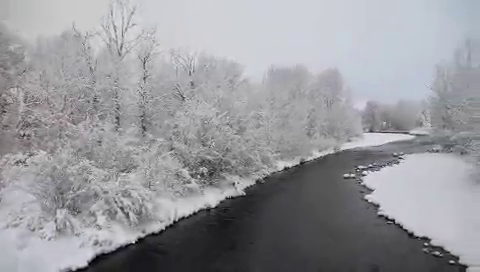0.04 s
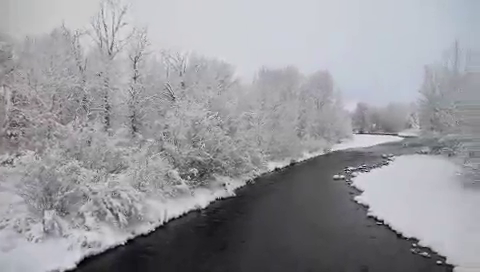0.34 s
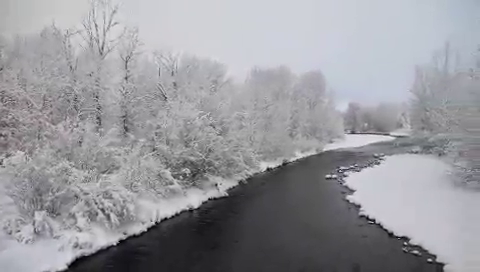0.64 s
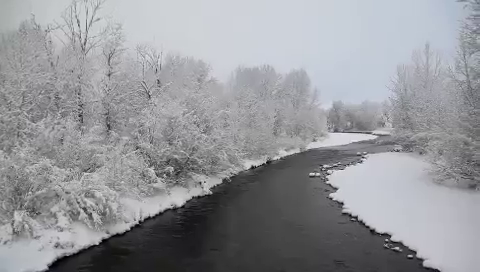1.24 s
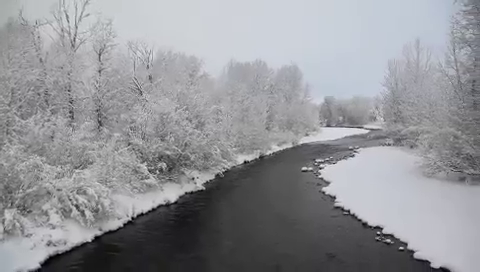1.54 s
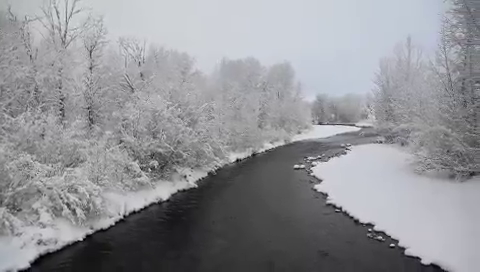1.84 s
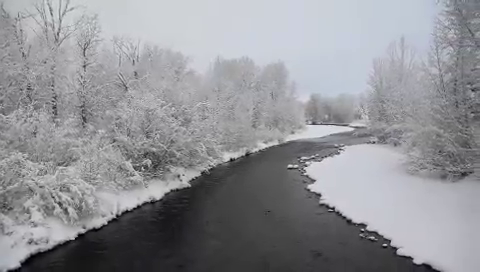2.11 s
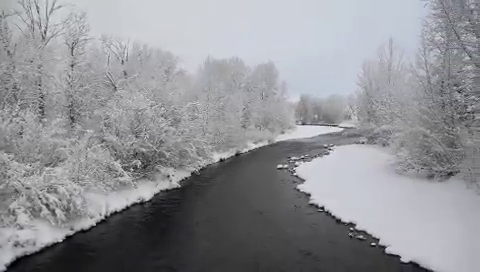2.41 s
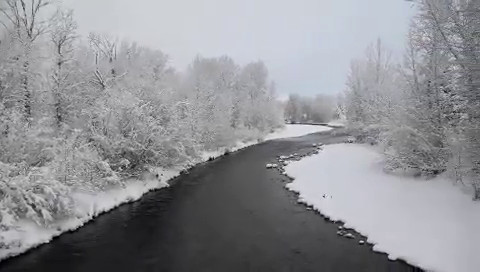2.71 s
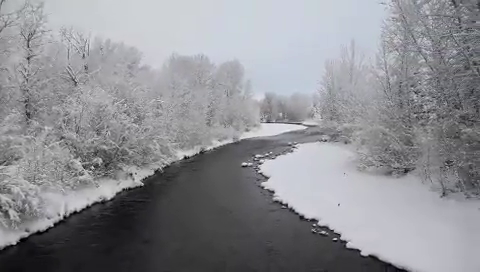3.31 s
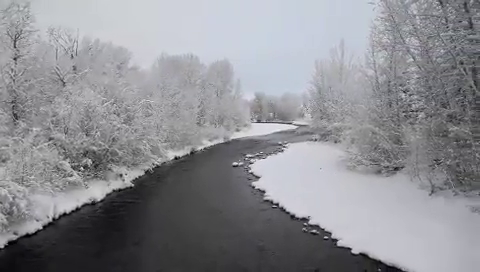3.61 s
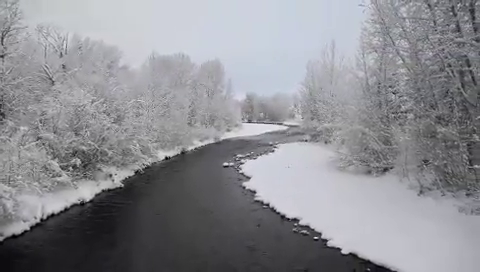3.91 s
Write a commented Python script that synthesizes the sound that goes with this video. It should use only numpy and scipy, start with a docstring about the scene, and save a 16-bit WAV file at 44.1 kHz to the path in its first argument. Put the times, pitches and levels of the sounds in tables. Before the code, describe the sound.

A small bird's high, buzzy trill starts loud just after the opening, then weakens and drops slightly in pitch. Beneath it runs the even rush of a woodland river, with occasional light ticks nearby.

```python
"""A snowy river rushes steadily from the start, a faint hum and a thin whine beneath it, and the first of
a few sharp ticks falls close by. A small bird then opens a long dry rattle, some ten buzzy notes a second:
one side of its syrinx holds a tone while the other sweeps up and down above it over 200 times a second.
The rattle slows and fades, and near the end a few shorter notes cross it. The scene is mono."""
import sys
import numpy as np
from scipy import signal
from scipy.fft import rfft, irfft, next_fast_len
from scipy.io import wavfile
from scipy.ndimage import uniform_filter1d, minimum_filter1d, map_coordinates

SR = 44100
rng = np.random.default_rng(int(sys.argv[2]) if len(sys.argv) > 2 else 0)


def file_out(sig):
    """Save sig as 16-bit WAV at sys.argv[1]."""
    # one column per channel
    cols = np.atleast_2d(sig).T
    # limit, then scale
    lim = np.clip(cols, -1, 1)
    pcm = np.round(lim * 32767).astype(np.int16)
    wavfile.write(sys.argv[1], SR, pcm)


N = 174195

BUZZ_HZ = 224.15  # pitch sweeps a second at the middle of a note


def bird():
    """The rattle: syrinx notes gain overtones and a breathy rasp, and the beak colours the tone."""
    # Each row: start in seconds, length in seconds, level in dB; the low tone's pitch, glide and arch
    # in Hz; the gap to the upper tone, its glide and the sweep depth in Hz; the low tone's balance in
    # dB, where the swell peaks (0-1), how hard the attack is chopped.
    notes = [(0.369, 0.04, -15, 4790, -450.0, -140.0, 1023, -360.0, 1250.0, -3.5, 0.5, 3),
             (0.4497, 0.039, -13.5, 4750, 644, 503, 996, -460.0, 1360, -1.5, 0.53, 4),
             (0.538, 0.039, -10.5, 4690, 106, 18, 468, 335, 1260, -9, 0.48, 0.7),
             (0.619, 0.042, -12, 4700, 282, 102, 464, 574, 1260, -6, 0.65, 3.5),
             (0.711, 0.045, -11.8, 4980, 114, 432, 328, 580.0, 1710, 0, 0.51, 3),
             (0.8011, 0.045, -13, 4810, -580.0, -89, 832, -310.0, 1140, 2, 0.41, 9),
             (0.89, 0.042, -13, 4610, 334, 2, 334, 454, 810.0, -4.5, 0.59, 9),
             (0.9887, 0.052, -12.5, 4710, -230.0, 372, 470, 184, 890, -1, 0.38, 3),
             (1.0813, 0.048, -14.5, 4670, 107, 350.0, 470.0, -180.0, 640, -5, 0.46, 9),
             (1.1658, 0.068, -14.5, 4590, -970.0, 52, 573, -570.0, 1420.0, -3, 0.52, 1),
             (1.267, 0.057, -12.5, 4790, -410.0, -200.0, 598, -570.0, 1130.0, 1, 0.52, 1.5),
             (1.361, 0.059, -15, 4756, -130.0, 222, 608, -310.0, 520.0, 3.5, 0.46, 2.5),
             (1.461, 0.048, -13, 4840, 16, 330.0, 910, 120.0, 1130.0, 4, 0.42, 0.5),
             (1.5536, 0.055, -14.5, 4765, -57, 305, 844, 340.0, 1180.0, 1, 0.49, 2.3),
             (1.6544, 0.06, -18.5, 4690, -320.0, 488, 674, 560.0, 1220, -3.5, 0.42, 1),
             (1.7567, 0.049, -16, 4630, 292, 190.0, 665, 596, 520.0, 2, 0.6, 2),
             (1.8524, 0.061, -16.6, 4590, 403, 37, 734, 590.0, 610.0, 4.5, 0.58, 1),
             (1.962, 0.057, -18, 4670, -30.0, 358, 456, 564, 500.0, -3.5, 0.5, 1.1),
             (2.0632, 0.056, -20.5, 4750.0, 338, 627, 495, 560.0, 507, -4, 0.33, 4),
             (2.171, 0.053, -19.5, 4580, 110.0, 620.0, 697, 480.0, 670.0, -8, 0.3, 3),
             (2.2784, 0.053, -16, 4465, -88, 356, 600.0, 293, 614, 0.5, 0.43, 1.2),
             (2.3725, 0.059, -18.3, 4570, -28, 203, 700, -490.0, 503, -5, 0.49, 2),
             (2.4745, 0.053, -14.9, 4550.0, 140.0, 462, 652, -130.0, 550.0, 0.5, 0.49, 1.5),
             (2.5776, 0.054, -16, 4640, -73, 400.0, 680, -120.0, 513, -1.5, 0.61, 1.5),
             (2.6833, 0.058, -21, 4490, -840.0, -130.0, 963, -440.0, 1370, 3, 0.52, 1),
             (2.793, 0.057, -20.5, 4590, -190.0, 334, 784, 318, 680.0, 2.5, 0.34, 0.5),
             (2.9, 0.058, -22, 4560, -350.0, 130.0, 777, -230.0, 457, -0.5, 0.42, 0),
             (2.9982, 0.06, -22, 4530, -230.0, 170.0, 725, -440.0, 400.0, 1, 0.6, 0.5),
             (3.0894, 0.038, -23.5, 4210, 990.0, 197, 555, -24, 1400, -26, 0.67, 0.5),
             (3.107, 0.059, -22, 4450.0, -230.0, 243, 653, 8, 422, 1, 0.5, 0.4),
             (3.1593, 0.041, -27, 4420, 920.0, 410.0, 577, 400.0, 540.0, -11, 0.6, 4),
             (3.2158, 0.053, -22, 4460, -30.0, 96, 870, -420.0, 1290.0, 3, 0.43, 2),
             (3.241, 0.032, -24.5, 4500.0, 230.0, -150.0, 487, 130.0, 500.0, -19, 0.57, 6),
             (3.315, 0.041, -24.5, 4380, 640.0, 117, 303, 50.0, 1190, -21, 0.57, 6),
             (3.3245, 0.056, -22.5, 4416, 0.0, 250.0, 845, -64, 540.0, 3, 0.2, 2),
             (3.3985, 0.032, -22.0, 4670, 953, 97, 294, -230.0, 860.0, -18, 0.64, 3),
             (3.4346, 0.054, -25.1, 4430, -130.0, 368, 690.0, -200.0, 360.0, 3, 0.17, 1.7),
             (3.495, 0.033, -24.9, 4730, 267, 650.0, 473, 310.0, 460.0, -4, 0.51, 2.5),
             (3.5417, 0.053, -24.5, 4360, -63, -120.0, 1130, -530.0, 640.0, 6, 0.65, 0.0),
             (3.659, 0.056, -26.5, 4460, -250, 107, 760, -250, 695, -0.5, 0.52, 1.8),
             (3.7697, 0.051, -25.2, 4360, 283, 546, 680.0, -120.0, 465, 1, 0.43, 2.6)]
    # One soft lead-in note, laid out the same way.
    lead_in = (.29, .019, -28, 4850, -200, 100, 300, 0, 1200, -3, .5, 2)
    # Each row: harmonic number, level in dB against the voice.
    harmonics = [(2, -17), (3, -45)]
    # The colour of the breath. Each row: frequency in Hz, relative level in dB.
    rasp_eq = [(3000, -37), (4500, -13), (7500, -1.5), (10000, -18), (12000, -30), (14000, -14),
               (16000, -37)]
    # The beak's filter. Each row: frequency in Hz, gain in dB.
    beak_eq = [(7000, 1), (10200, -12.5), (11300, -22.5), (13900, -2), (15500, -15)]
    song = np.zeros(N, complex)
    for start, length, db, *shape in [lead_in, *notes]:
        add(song, start, amp(db) * buzzy_note(length, *shape))
    power = uniform_filter1d(np.abs(song) ** 2, round(SR / BUZZ_HZ))  # averaged over one sweep
    strength = np.sqrt(np.abs(power)) + 1e-6
    overtones = sum(amp(db) * strength * ((song / strength) ** round(k)).real for k, db in harmonics)
    breath = unit(equalise(rng.standard_normal(N), rasp_eq))
    rasp = amp(-33) * np.abs(song) * breath  # pulses with the voice
    return equalise(song.real + overtones, beak_eq) + rasp


def buzzy_note(length, low_hz, glide_hz, arch_hz, gap_hz, gap_glide_hz, sweep_hz, low_db, peak_at, chop):
    """A held tone beats against a sweeping one; the note opens in separate pulses that soon merge."""
    slowing, jitter, depth_scatter = 0.14, 0.018, 0.25
    n = round(length * SR)
    progress = (np.arange(n) + .5) / n
    from_middle = progress - .5
    rate_hz = BUZZ_HZ * (1 - slowing * from_middle + jitter * wobble(BUZZ_HZ / 2, n))
    cycle = .5 - .5 * np.cos(2 * np.pi * np.cumsum(rate_hz) / SR)
    depth_hz = sweep_hz * (1 + depth_scatter * wobble(BUZZ_HZ, n))
    flick = cycle ** 4.5  # sharpens each sweep to a spike
    sweep = depth_hz * (flick - flick.mean())
    held_hz = low_hz + glide_hz * from_middle - arch_hz * (2 * from_middle) ** 2
    upper = syrinx_side(held_hz + gap_hz + gap_glide_hz * from_middle + sweep)
    lower = amp(low_db) * syrinx_side(held_hz + 0.29 * sweep)  # takes a little of the sweep
    skew = np.log(.5) / np.log(np.clip(peak_at, .1, .9))
    swell = np.sin(np.pi * progress ** skew) ** 0.75
    dip = chop * (1 - progress) ** 1.6 + 0.027  # between sweeps, deepest at the attack
    note = (upper + lower) * swell * np.exp(-dip * (1 - cycle))
    return note / note.real.std()


def syrinx_side(hz):
    """One side of the syrinx as a rough complex tone, louder where it meets the throat's resonance."""
    # The throat's resonance. Each row: frequency in Hz, gain in dB.
    throat_eq = [(3800, -4), (4500, 9.5), (5300, 9.5), (6000, 1), (7500, -1.5)]
    waver_hz, shimmer_db, flutter_rate_hz = 34.7, 1.8, 416.4
    hz = hz + waver_hz * wobble(flutter_rate_hz, len(hz))
    gain = amp(along(throat_eq, hz) + shimmer_db * wobble(flutter_rate_hz, len(hz)))
    return gain * np.exp(2j * np.pi * (np.cumsum(hz) / SR + rng.random()))


def woods(call):
    """The snowy trees return a diffuse tail whose highs die first."""
    # Each row: frequency in Hz, seconds to fall by 60 dB.
    decay_times = [(2000, 0.96), (5000, 1.0), (12000, 0.26)]
    hz, t, noise = signal.stft(rng.standard_normal(SR // 2), SR, nperseg=256)
    decay = amp(-60 * t / along(decay_times, hz)[:, None])
    tail = signal.istft(noise * decay, SR, nperseg=256)[1]
    return signal.fftconvolve(call, tail / np.linalg.norm(tail))[:N]


def ticks():
    """Small hard contacts close by: a crack, a brief ring and two near reflections."""
    # Each row: start in seconds, level in dB, trim of the low ring in dB.
    hits = [(.177, -13, -5), (.514, -15.5, -16), (1.912, -15.5, -2.5), (2.573, -14.5, -7.5),
            (2.971, -13.5, 2.5), (3.711, -12.5, -3)]
    # The ring. Each row: frequency in Hz, level in dB, seconds to fall by 60 dB.
    modes = [(2480, -4, 0.036), (3170, 3.5, 0.002), (6670, -2, 0.0047), (7620, -5.5, 0.0051),
             (8480, -6.5, 0.0044), (10300, -26, 0.0055)]
    # Each row: delay in seconds, level in dB against the direct tick.
    reflections = [(.0035, -6), (.014, -19)]
    # The colour of the whole tick. Each row: frequency in Hz, gain in dB.
    tick_eq = [(1000, -11.5), (3000, 4.5), (8000, 5), (11000, -12.5), (15000, -31)]
    low_ring_below_hz, crack_db, crack_t60_s = 3000, 0.5, 0.011
    track = np.zeros(N)
    t = np.arange(SR // 20) / SR
    for start, db, trim_db in hits:
        ring = np.zeros(len(t))
        for hz, mode_db, t60 in modes:
            fade = amp(mode_db + trim_db * (hz < low_ring_below_hz) - 60 * t / t60)
            ring += fade * np.sin(2 * np.pi * hz * t)
        crack = amp(crack_db - 60 * t / crack_t60_s) * rng.standard_normal(len(t))
        for delay, echo_db in [(0, 0), *reflections]:
            add(track, start + delay, amp(db + echo_db) * (ring + crack))
    return equalise(track, tick_eq)


def river():
    """Running water: a broad, slightly patchy rush; the level dips briefly early on."""
    # The fader ride. Each row: time in seconds, level in dB before the lift.
    ride = [(0.0, -36), (0.38, -33.5), (0.53, -36.5), (0.74, -39), (1.86, -34.5), (2.75, -34.5),
            (2.87, -35), (3.95, -35)]
    # The body of the rush, then its top end. Each row: frequency in Hz, relative level in dB.
    body_eq = [(25, -20), (50, -7.5), (100, -1.5), (170, -5.5), (280, -0.5), (420, 2), (750, -1),
               (1200, -1), (1700, -3.5), (2100, -7), (2400, -7.5), (2550, 0), (2750, -8), (3050, -11.5),
               (3350, -11.5), (3550, -5.5), (3800, -13), (5000, -12.5), (7000, -14), (9500, -26.5)]
    top_eq = [(12000, -33), (15000, -36), (16000, -44)]
    patchy_db, wobble_db, lift_db = 1.1, 0.84, 2.5
    noise = signal.stft(rng.standard_normal(N), nperseg=512)[2]
    patches = uniform_filter1d(rng.standard_normal(noise.shape), 4, axis=0)  # smeared in pitch
    patches = uniform_filter1d(patches, 8, axis=1)  # and in time
    water = signal.istft(noise * amp(patchy_db * unit(patches)), nperseg=512)[1][:N]
    level_db = np.interp(np.arange(N) / SR, *np.transpose(ride)) + wobble_db * wobble(11, N)
    return amp(level_db + lift_db) * unit(equalise(water, body_eq + top_eq))


def hum_and_whine():
    """Faint low hums come and go; a thin whine stays."""
    # Each row: start in seconds, end in seconds, pitch in Hz, level in dB when fully faded in.
    hums = [(-.1, 1.5, 59, -54), (1.219, 1.25, 61.4, -45), (1.52, 1.75, 98.6, -41.5)]
    whine_hz, whine_db, fade_s = 15661, -61, 0.076
    t = np.arange(N) / SR
    track = amp(whine_db) * np.sin(2 * np.pi * whine_hz * t)
    for start, end, hz, db in hums:
        fade = np.clip(np.minimum(t - start, end - t) / fade_s, 0, 1)
        track += amp(db) * fade * np.sin(2 * np.pi * hz * t)
    return np.sqrt(2) * track  # makes the levels rms


def amp(db):
    """Decibels to gain."""
    return 10 ** (np.asarray(db) / 20)


def unit(x):
    """Scale to rms 1."""
    return x / np.sqrt(np.mean(x ** 2) + 1e-20)


def along(points, hz):
    """Read a curve of (Hz, value) points on a log frequency axis."""
    knots_hz, values = np.transpose(points)
    return np.interp(np.log(np.abs(hz) + 1), np.log(knots_hz + 1), values)


def wobble(rate, size):
    """A smooth random curve with `rate` knots a second."""
    return map_coordinates(rng.standard_normal(256), [np.arange(size) * rate / SR], mode="wrap")


def filtered(x, response):
    """Filter by a gain given as a function of frequency."""
    size = next_fast_len(N + SR // 2)
    return irfft(rfft(x, size) * response(np.fft.rfftfreq(size, 1 / SR)), size)[:N]


def equalise(x, curve):
    """Apply an EQ curve of (Hz, dB) points."""
    return filtered(x, lambda hz: amp(along(curve, hz)))


def add(track, start, sound):
    """Mix a sound in at `start` seconds."""
    part = track[max(round(start * SR), 0):][:len(sound)]
    part += sound[:len(part)]


def scene():
    """The bird and its weak woodland tail over ticks, river and hum, the same in both channels."""
    call = bird()
    mono = call + amp(-23) * woods(call) + ticks() + river() + hum_and_whine()
    return np.array([mono, mono])


def record(dry):
    """A fast limiter holds the highest peaks, then the very top is cut off."""
    ceiling, limiter_s, top_hz = .92, .002, 16300
    window = round(limiter_s * SR)
    needed = np.minimum(1, ceiling / (np.abs(dry[0]) + 1e-9))
    gain = uniform_filter1d(minimum_filter1d(needed, 2 * window), window)
    return np.array([filtered(channel * gain, lambda hz: hz < top_hz) for channel in dry])


dry = scene()
out = record(dry)
file_out(out)
```